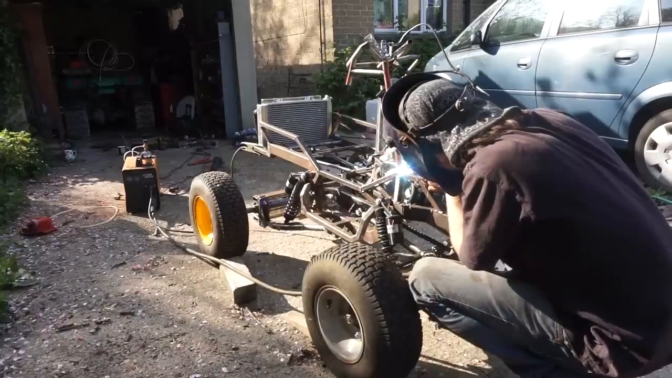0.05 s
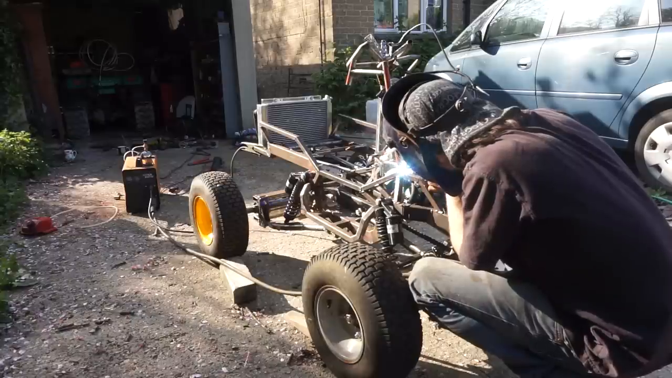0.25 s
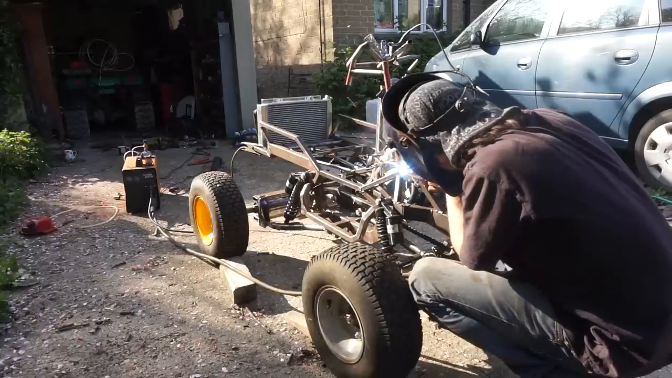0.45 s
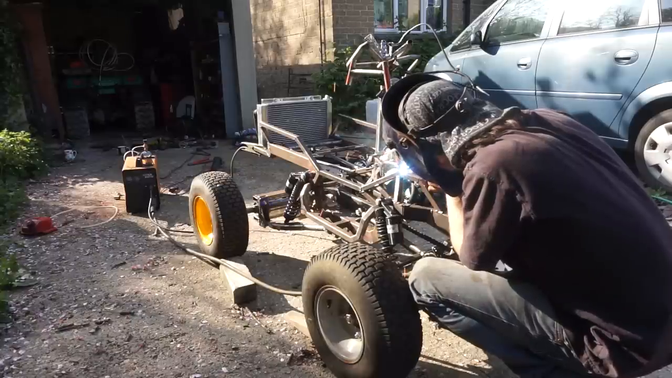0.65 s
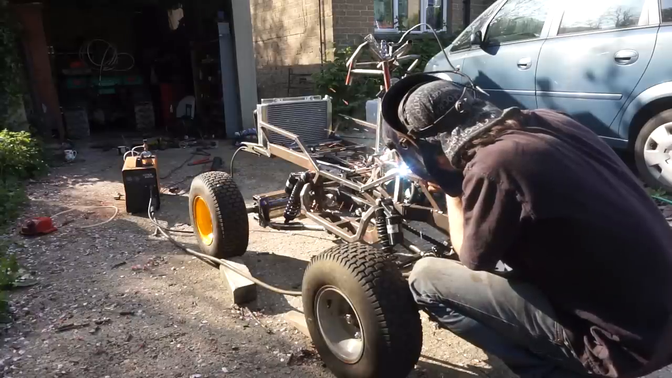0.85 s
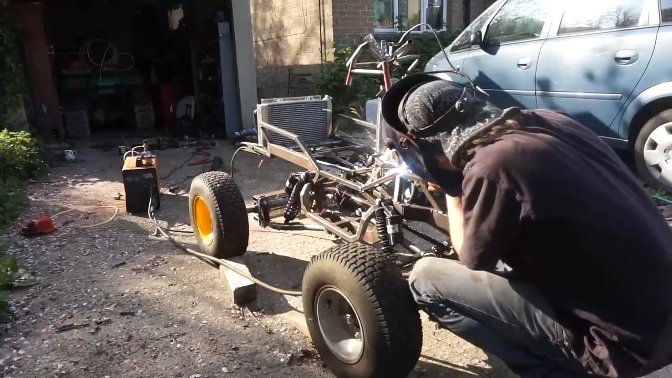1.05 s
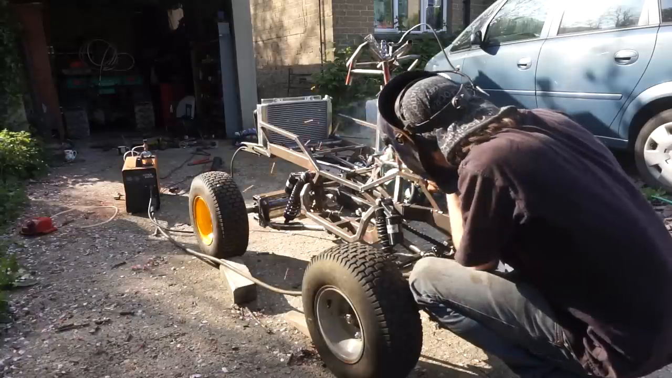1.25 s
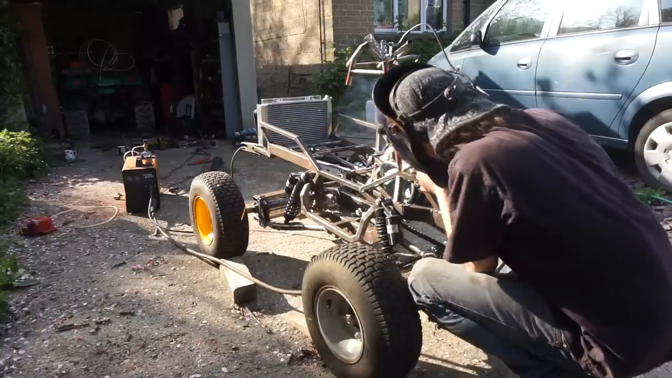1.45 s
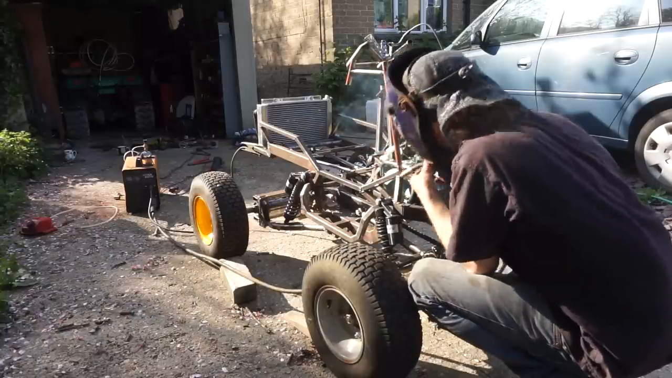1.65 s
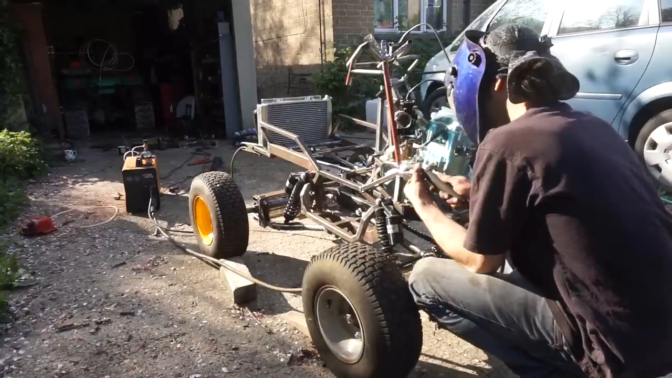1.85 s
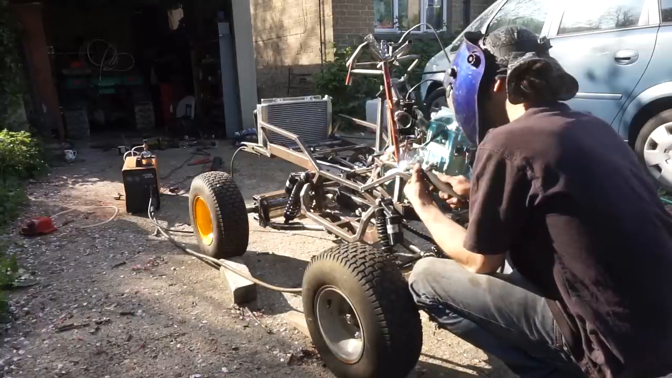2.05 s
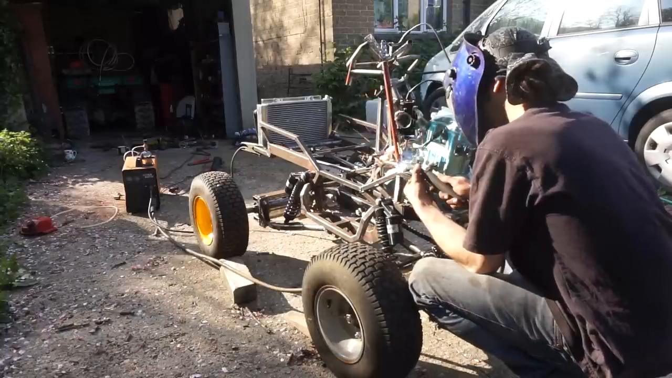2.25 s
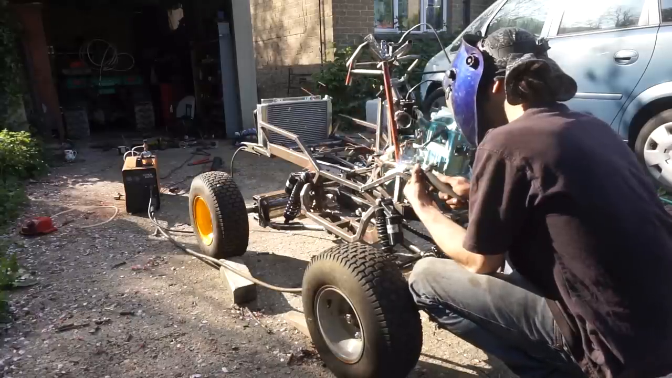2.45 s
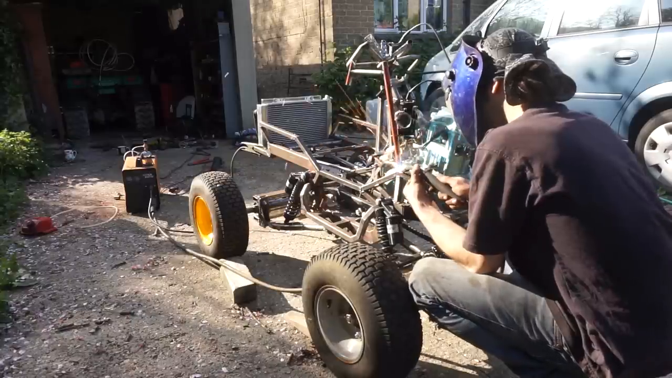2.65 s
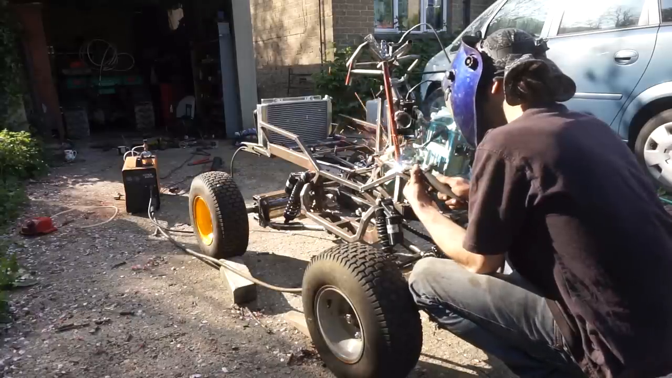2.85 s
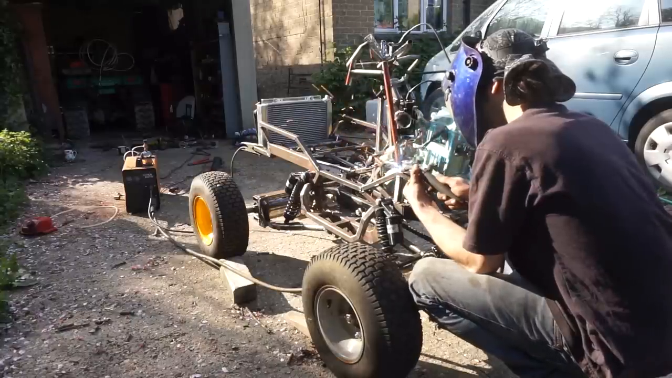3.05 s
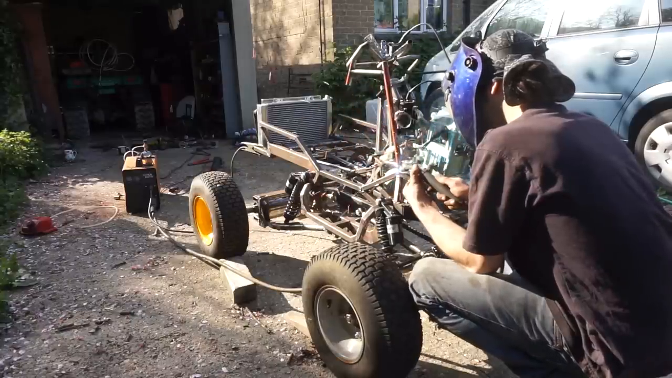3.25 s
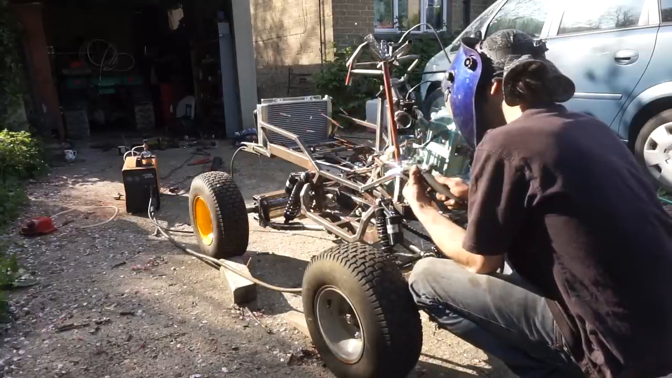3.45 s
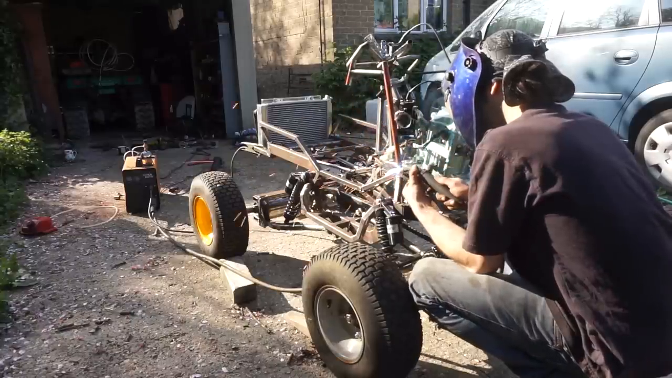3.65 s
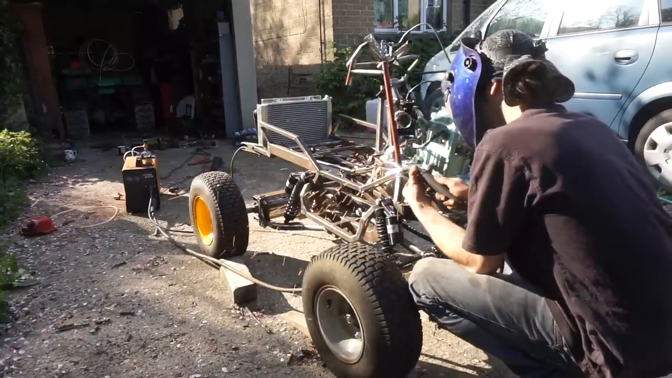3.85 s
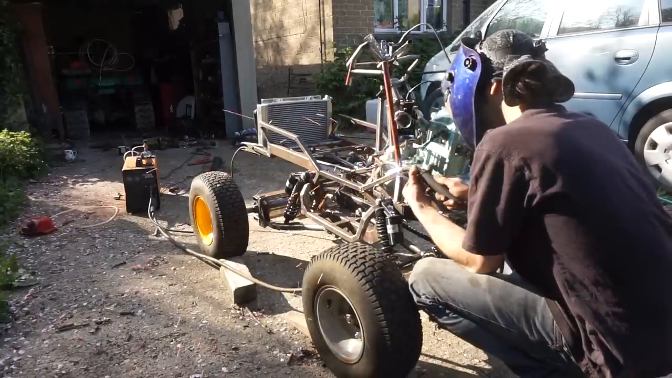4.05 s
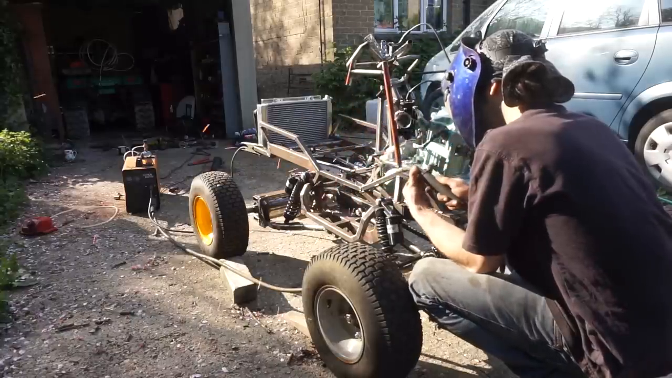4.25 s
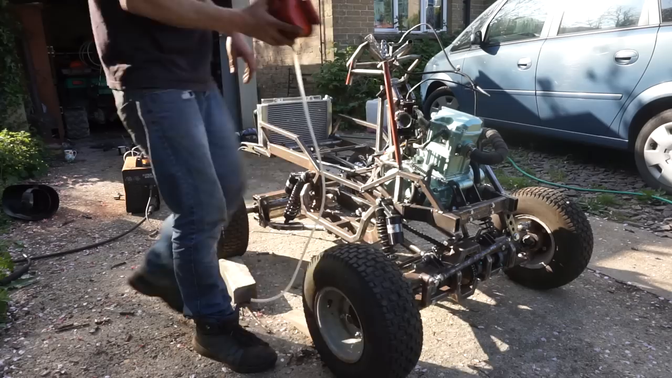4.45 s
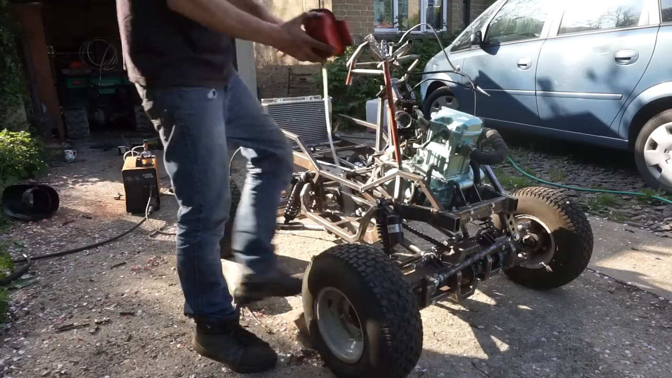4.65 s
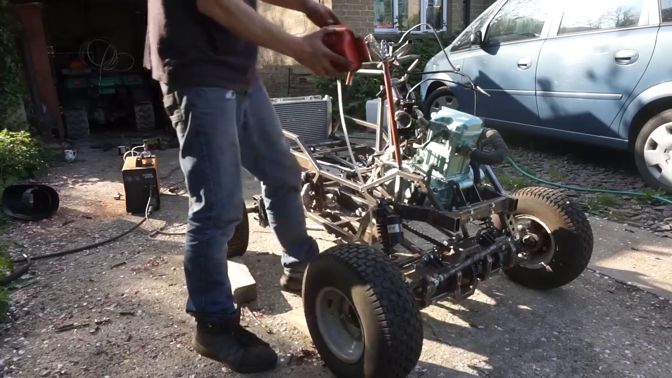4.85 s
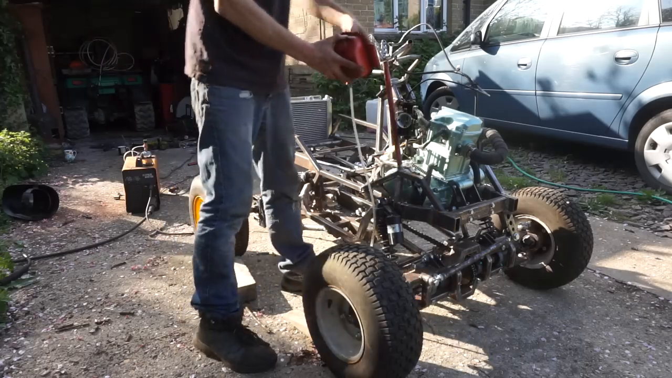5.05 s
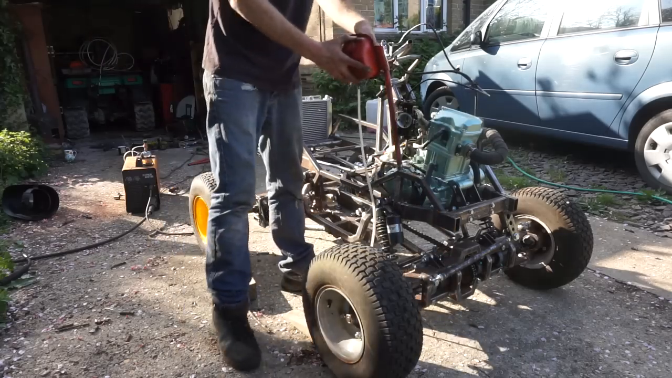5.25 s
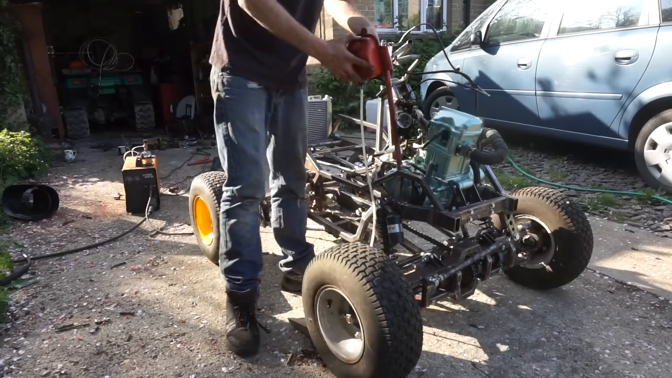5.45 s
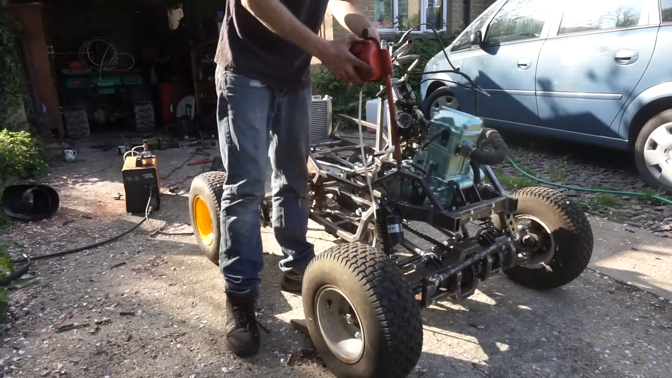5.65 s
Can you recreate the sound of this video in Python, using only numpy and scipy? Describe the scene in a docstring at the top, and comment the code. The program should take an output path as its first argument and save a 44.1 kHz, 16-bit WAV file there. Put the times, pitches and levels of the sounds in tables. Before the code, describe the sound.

A welder crackles loudly, stops, restarts and sputters, then cuts abruptly to quiet yard noise, gritty footsteps, hollow plastic knocks and bird chirps.

```python
"""Two bursts of short-circuit arc welding on a tube frame in a driveway, then a reel carried over gravel.
The first burst is under way at the start: each time the wire's molten bridge breaks, the arc relights with a pop.
In the pause birds call and shielding gas puffs; the second burst strikes, falters and relights until 4.2 s.
Tube frame, welder and yard throw every pop back: short paths, then a swaying reverberation.
At 4.487 s a cut: the background is heard louder, boots scuff gravel, a plastic cable reel knocks, birds call."""
import sys
import numpy as np
from scipy import signal
from scipy.fft import rfft, irfft, next_fast_len
from scipy.io import wavfile
from scipy.ndimage import uniform_filter1d

SR = 44100
rng = np.random.default_rng(int(sys.argv[2]) if len(sys.argv) > 2 else 0)


def pcm_store(signal):
    """Save signal as 16-bit PCM."""
    levels = np.round(np.clip(np.atleast_2d(signal), -1, 1) * 32767)
    wavfile.write(sys.argv[1], SR, levels.astype(np.int16).T)


N = 251370  # samples

# Yard wash during welding: time_s, level_db
WASH_WELDING_LEVEL = [(0, -66), (1.2, -64), (1.8, -60), (2.1, -65), (4.2, -70), (4.487, -69)]
# Its spectrum: freq_hz, density_db_per_hz
WASH_WELDING_COLOUR = [(20, -28.5), (40, -12), (130, -7.5), (215, -4.5), (370, -12), (560, -5.5),
                       (1500, -19), (2900, -24), (3600, -30), (8000, -37), (15600, -42)]
# Wash after the cut: freq_hz, density_db_per_hz
WASH_LATER_COLOUR = [(47, -31), (80, -0.5), (162, -8), (375, -7), (467, -3), (900, -1), (1250, -6),
                     (1540, -10.5), (2600, -19.5), (3970, -31.5), (7210, -32.5), (15600, -36)]
# Left-right likeness of background noise: freq_hz, likeness (0 to 1)
LIKENESS = [(60, 0.9), (180, 0.77), (550, 0.46), (1650, 0.25), (4970, 0.056), (15000, 0.52)]
# Shielding gas puffs as the trigger is pulled: time_s, level_db
GAS_LEVEL = [(1.725, -77), (1.757, -75), (1.762, -43.5), (1.845, -57)]
# Gas spectrum: freq_hz, density_db_per_hz
GAS_SPECTRUM = [(180, -32), (300, -0.5), (1440, -3), (2990, -12), (4900, -4.5), (10700, -12), (12400, -2),
                (15600, -13)]
# Power source fan and a thin whine: pitch_hz, welding_db, second_pause_db, after_cut_db
FAN_TONES = [(458, -68, -71, -62), (920, -88, -77, -72), (15402, -87, -91, -77)]
# Far bird notes: start_s, length_s, start_hz, end_hz, level_db
BIRD_NOTES = [(1.262, .045, 4600, 4450, -77), (1.495, .05, 4150, 4350, -75), (4.85, .075, 7150, 7000, -66),
              (4.965, .05, 7000, 6950, -66), (5.185, .062, 3650, 4380, -63), (5.325, .078, 3750, 4150, -57),
              (5.503, .09, 7100, 7200, -71)]
# Low throb: time_s, level_db
RUMBLE_LEVEL = [(0, -81.5), (3.3, -81), (3.7, -74), (4.486, -76), (4.49, -53), (5.7, -56)]
# Boot scuffs: peak_s, level_db, fall_by_20_db_s
BOOT_SCUFFS = [(4.49, -52, .04), (4.62, -51, .08), (4.728, -47, .07), (5.018, -51, .08), (5.245, -44, .05),
               (5.33, -43, .1), (5.375, -45, .08), (5.393, -42, .1), (5.466, -36, .04), (5.678, -40, .1)]
# Gravel spectrum: freq_hz, density_db_per_hz
GRAVEL_COLOUR = [(290, -32), (500, -2), (1310, -5), (1750, -3), (2770, -5), (3810, -11), (7000, -24),
                 (15600, -34)]
# Modes of the reel: pitch_hz, level_db, t60_s
REEL_MODES = [(400, -2, .035), (550, -2, .035), (700, 0, .045), (900, -4, .03), (1310, -3, .05),
              (1955, -9, .03), (2700, -8, .025), (3400, -5, .03), (4400, -1, .035)]
# Knocks on the reel: start_s, peak_db, struck_spot_hz, rattle_decay_ms, ring_length_factor, left_over_right_db
REEL_KNOCKS = [(4.618, -31, 720, 3, 1, .5), (5.1314, -25, 760, 1.5, 1.2, 1.5),
               (5.242, -33, 1900, 3, .6, 1.5), (5.318, -33, 600, 1, .5, 1), (5.327, -26, 560, 1, 1.1, 1.5),
               (5.3545, -24, 430, .6, 1.1, 1.5), (5.4463, -16, 1100, .3, .3, 1),
               (5.656, -28, 780, 6, 1.5, -1.5), (5.678, -24.5, 1250, 12, 1, -3)]
# Ticks of grit and cable: start_s, peak_db, pitch_hz, decay_ms
GRIT_TICKS = [(4.4881, -36, 3080, 2.1), (4.7254, -36, 3000, 2.7), (4.7556, -39, 5500, 2.6),
              (4.8165, -39, 3300, 1.2), (5.2914, -37, 3300, 2.6), (5.327, -31, 3000, 1.5),
              (5.338, -33, 2100, 4.0), (5.3946, -27, 2900, 2.1), (5.4628, -29, 3300, 1.9),
              (5.468, -28, 2650, 3.3)]
# Thumps of the striking arc, then of feet: start_s, level_db, pitch_hz
LOW_THUMPS = [(1.8615, -40, 190), (1.9055, -45, 170), (4.258, -51, 54), (4.647, -37, 98), (4.831, -40, 133),
              (4.929, -33, 242)]
# Yard reverberation: freq_hz, t60_s
YARD_DECAY = [(250, .35), (700, .3), (1700, .24), (4600, .21), (12000, .18)]
# Colour of one pop, a list per torch position: freq_hz, density_db_per_hz
POP_COLOURS = [
    [(60, -60), (110, -33), (250, -22), (380, -4), (560, -2), (795, -11.5), (1070, -5), (1640, -11),
     (2250, -7), (3200, -9.5), (4300, -7.5), (5230, -3.3), (7030, -.5), (13500, -.5), (15700, -4.5)],
    [(59, -44), (100, -24), (250, -25), (387, -7.5), (700, -12), (1070, -6), (1630, -5.5), (2290, -4),
     (3280, -11.5), (4250, -3.5), (5200, -4), (7180, 0), (13500, -1), (15700, -4.7)],
    [(59, -46), (100, -30), (240, -33), (420, -7), (700, -8), (1150, -1), (1630, -12), (2290, -9),
     (5120, -4.5), (6880, -2), (13500, -1.3), (15700, -3)],
]
# Paths by tubes, torch and hands, a list per torch position: delay_ms, left_gain, right_gain
POP_PATHS = [
    [(0.0, 0.7, 1.0), (0.152, 0.09, 0.04), (0.27, 0.1, 0.13), (0.352, -0.15, -0.17), (0.377, 0.15, 0.16),
     (0.483, -0.09, -0.15), (0.61, -0.15, -0.09), (0.87, 0.08, 0.14), (1.154, 0.06, 0.11), ],
    [(0.0, 0.65, 1.0), (0.212, 0.03, 0.1), (0.299, 0.15, 0.19), (0.488, -0.16, -0.29),
     (0.576, -0.21, -0.24), (0.622, -0.17, -0.16), (0.675, -0.11, -0.13), (0.786, -0.1, -0.17),],
    [(0.0, 0.72, 1.0), (0.16, 0.14, 0.05), (0.303, 0.15, 0.21), (0.375, 0.05, 0.18), (0.456, 0.17, 0.16),
     (0.675, -0.12, -0.09), (0.799, -0.08, -0.17), (0.87, 0.07, 0.11)],
]
# Weight of the yard's returns per torch position: weight_db
YARD_WEIGHTS = [-8.5, -9, -10.5]
# Weight of the blurred noise after each pop, per torch position: weight_db
SCATTER_WEIGHTS = [-28, -25.5, -28]
# Torch changes position: middle_of_crossfade_s
TORCH_MOVES = [1.5, 3.06]
# Welding bursts: time_s, pop_peak_db, wait_between_pops_ms
WELD_BURSTS = [
    [(-.13, -10.5, 5.3), (.2, -9.5, 5.3), (.4, -11.5, 5.5), (.7, -11.5, 6), (1.104, -11.5, 5.9)],
    [(1.844, -23, 4), (1.87, -10, 5.6), (2.3, -9, 5.6), (2.85, -9, 5.8), (3.1, -10, 6), (3.35, -10.5, 6),
     (3.57, -11, 4.8), (3.75, -9.7, 6), (3.95, -10, 6.8), (4.16, -10, 6.6)],
]
# Arc strikes, or falters and relights: time_s, peak_db, silence_before_ms, added_wait_after_ms
ARC_RELIGHTS = [(1.1011, -8, 6, 0), (1.8449, -18, 1, 0), (1.8629, -3.5, 6, 7), (1.907, -3.5, 6, 4.5),
                (1.9384, -8, 7, 4), (2.2962, -4, 8, 0), (2.629, -10, 12, 3), (2.7878, -5.5, 11, 1),
                (3.3002, -12, 14, 0), (3.4276, -7, 9, 1), (3.4424, -18, 8, 0), (3.4725, -14, 33, 9),
                (3.4885, -6.5, 18, 5), (3.6377, -6, 12.5, 1), (3.6626, -8.5, 11, 2.5),
                (3.6976, -5.5, 8.5, 0), (3.9261, -10.5, 16, 1), (4.1197, -4.5, 7, 0), (4.1575, -9.5, 8, 0)]
# Left over right for the arc: freq_hz, difference_db
ARC_BALANCE = [(400, 0), (1100, 1), (1600, -.3), (2300, -1.2), (3500, -1.7), (5000, -1.3), (8000, 1),
               (13000, 2.3)]
# Peaks and dips that ground and frame put on all the arc sends out: freq_hz, gain_db
GROUND_COLOUR = [(650, 0), (770, -3), (860, 2), (960, -3), (1085, 1), (1250, -2), (1380, -9), (1510, 2),
                 (1640, -2.5), (1800, 0)]
# Left-right difference of the capsules: freq_hz, gain_db
SIDE_GAIN = [(30, -20), (125, -12), (250, -16), (1000, -3.5), (2000, 2.5), (4000, -1.5), (8000, -4.5),
             (12000, -1.5)]

CUT_S, WASH_LATER_DB = 4.487, -43.5
BIRD_GLIDE_SHARE, BIRD_WARBLE_HZ, BIRD_HOARSE_DB = .18, 60, 5  # glide: time constant, share of the note
SCUFF_RISE_S, SHUFFLE_DB = .015, -59  # rise: 20 dB in this time
FOCUS_DB_PER_OCTAVE = 14  # modes weaken away from the struck spot's pitch
CLOSE_DB, CLOSE_T60_S, CLOSE_HZ = 6.5, .018, 2500  # close things: against the yard, weak below CLOSE_HZ
FAR_DB, FAR_T60_S = -33, .7  # faint far returns linger: against the yard
LEAD_RAD = .4  # phase lead of a pop
LEAD_SAMPLES = 256  # kept ahead of a pop's front
RUN_IN_SAMPLES = 6000  # welding before the start, its echoes still in the yard
SETTLE_S = .055  # added wait has shrunk to about a third
WAIT_SCATTER, PEAK_SCATTER_DB = .1, 1.7
HELD_FACTOR, EARLY_FACTOR, EARLY_DB = 1.45, .7, -6  # bridge holds on, or breaks early and small
MEMORY, PAUSE_PER_SIZE = .18, .04  # each wait and size leans on the last; a big pop, a longer wait
SCATTER_PEAK_MS = .3  # after the pop
SWAY_HZ = .45  # hands and body sway, so the returns keep changing


def amp(db):
    """Gain of a level in dB."""
    return 10 ** (np.asarray(db) / 20)


def evened(x):
    """Scaled to rms 1."""
    return x / np.sqrt(np.mean(x ** 2) + 1e-20)


def read(points, hz):
    """Spectrum table read on a log frequency axis."""
    freq_hz, value = np.transpose(points)
    return np.interp(np.log(hz + 1), np.log(freq_hz + 1), value)


def curve(rows):
    """Gain from a level curve, silent outside the table."""
    time_s, level_db = np.transpose(rows)
    return amp(np.interp(np.arange(N) / SR, time_s, level_db, -200, -200))


def add(mix, start_s, sound, pan_db=0):
    """Mixes a sound into both channels; positive pan_db leans left."""
    part = mix[:, round(start_s * SR):][:, :len(sound)]
    part += amp([[pan_db / 2], [-pan_db / 2]]) * sound[:part.shape[1]]


def coloured(x, colour):
    """Filtered by a spectrum table without delay."""
    size = next_fast_len(x.shape[-1] + 4096)
    gain = amp(read(colour, np.fft.rfftfreq(size, 1 / SR)))
    return irfft(rfft(x, size) * gain, size)[..., :x.shape[-1]]


def noise(colour, patchy_db):
    """Two-channel noise with drifting patches in time and frequency, alike as LIKENESS says."""
    frames, hz = N // 256 + 5, np.fft.rfftfreq(1024, 1 / SR)
    a, b, c, d, patches = rng.standard_normal((frames, 513, 5)).T
    patches = uniform_filter1d(patches, size=10, axis=0)
    patches = evened(uniform_filter1d(patches, size=10, axis=1))
    same = read(LIKENESS, hz)[:, None]
    left = a + 1j * b
    right = same * left + np.sqrt(1 - same ** 2) * (c + 1j * d)
    bins = np.array([left, right]) * amp(read(colour, hz)[:, None] + patchy_db * patches)
    return evened(signal.istft(bins, nperseg=1024, noverlap=768)[1][:, :N])


def tail(rise_ms, alike):
    """Reverberation of energy 1 (left): dense random returns, each band dying at its own speed."""
    shared, *own = rng.standard_normal((3, SR // 2))
    returns = alike * shared + np.sqrt(1 - alike ** 2) * np.array(own)
    hz, t, bins = signal.stft(returns, SR, nperseg=128)
    small = (hz ** 2 / (hz ** 2 + CLOSE_HZ ** 2))[:, None]  # small things return little bass
    dying = amp(-60 * t / read(YARD_DECAY, hz)[:, None])
    dying = dying + amp(CLOSE_DB - 60 * t / CLOSE_T60_S) * small
    dying = dying + amp(FAR_DB - 60 * t / FAR_T60_S)
    out = signal.istft(bins * dying, SR, nperseg=128)[1]
    out *= np.clip(np.arange(out.shape[1]) / SR * 1000 / rise_ms, 0, 1)
    return out / np.linalg.norm(out[0])


def yard_wash():
    """Patchy noise: a slowly moving level before the cut, a steady one after, each with its colour."""
    later = np.arange(N) / SR > CUT_S
    out = curve(WASH_WELDING_LEVEL) * noise(WASH_WELDING_COLOUR, patchy_db=1.2)
    return out + amp(WASH_LATER_DB) * later * noise(WASH_LATER_COLOUR, patchy_db=2)


def fan_tones():
    """Fan and whine: steady sines with slowly drifting level and phase."""
    t, out = np.arange(N) / SR, np.zeros((2, N))
    for hz, welding_db, pause_db, later_db in FAN_TONES:
        level_db = np.where(t < CUT_S, np.interp(t, [1.7, 4.2], [welding_db, pause_db]), later_db)
        drift = evened(uniform_filter1d(rng.standard_normal(N), size=1500))
        out += np.sqrt(2) * amp(level_db + 3.0 * drift) * np.sin(2 * np.pi * hz * t + 0.13 * drift)
    return out


def birds():
    """Far bird notes: sines gliding to their end pitch, pitch and level wobbling."""
    out = np.zeros((2, N))
    for start_s, length_s, start_hz, end_hz, level_db in BIRD_NOTES:
        u = np.linspace(0, 1, round(length_s * SR))
        pitch, level = evened(uniform_filter1d(rng.standard_normal((2, len(u))), size=200))
        hz = end_hz + (start_hz - end_hz) * np.exp(-u / BIRD_GLIDE_SHARE) + BIRD_WARBLE_HZ * pitch
        note = amp(level_db + BIRD_HOARSE_DB * level) * np.sin(2 * np.pi * np.cumsum(hz) / SR)
        add(out, start_s, note * np.sqrt(np.hanning(len(u))))
    return out


def rumble():
    """Low throb near 54 Hz: noise through two narrow resonances, swelling and fading."""
    throb = rng.standard_normal(N)
    for q in (2.5, 3.5):
        throb = signal.lfilter(*signal.iirpeak(54, q, SR), throb)
    return curve(RUMBLE_LEVEL) * evened(throb)


def gas_puff():
    """Shielding gas puffing out of the torch: shaped turbulent noise."""
    return curve(GAS_LEVEL) * noise(GAS_SPECTRUM, patchy_db=2)


def gravel():
    """Grit crunching under boots: noise broken into 2.5 ms grains, swelling at each scuff."""
    grains = amp(4.5 * np.minimum(rng.exponential(1, N), 2)) * (rng.random(N) < 500 / SR)  # 500 per s
    grains = signal.lfilter([1], [1, -np.exp(-1000 / (2.5 * SR))], grains)
    t = np.arange(N) / SR
    level = amp(SHUFFLE_DB)
    for peak_s, level_db, fall_s in BOOT_SCUFFS:
        away = np.maximum((peak_s - t) / SCUFF_RISE_S, (t - peak_s) / fall_s)
        level = level + amp(level_db - 20 * away)
    return (t > CUT_S) * level * evened((0.35 + evened(grains)) * noise(GRAVEL_COLOUR, patchy_db=0.5))


def add_knocks(mix, t):
    """Hollow reel struck: its modes and a contact crack, excited by a blow and chattering loose parts."""
    for start_s, peak_db, spot_hz, rattle_ms, length, pan_db in REEL_KNOCKS:
        hiss = rng.standard_normal(len(t))
        ring = .7 * (1 - t / .00012) * np.exp(-t / .00012)  # contact crack
        for (hz, mode_db, t60_s), detune in zip(REEL_MODES, rng.standard_normal(len(REEL_MODES))):
            focus_db = -FOCUS_DB_PER_OCTAVE * abs(np.log2(hz / spot_hz))
            decay = amp(mode_db + focus_db - 60 * t / (t60_s * length))
            ring += decay * np.sin(2 * np.pi * hz * (1 + .012 * detune) * t)
        blow = (t == 0) + 0.11 * hiss * np.exp(-1000 * t / rattle_ms)
        sound = signal.oaconvolve(blow, ring)[:len(t)]
        sound = signal.lfilter(*signal.butter(2, 250, "high", fs=SR), sound)  # small body, no bass
        add(mix, start_s, amp(peak_db) * sound / abs(sound).max(), pan_db)


def add_ticks(mix, t):
    """Grit and cable ticks: short decaying noise in a resonant band."""
    for start_s, peak_db, hz, decay_ms in GRIT_TICKS:
        peak = signal.iirpeak(hz, .9, SR)
        band = signal.lfilter(*peak, signal.lfilter(*peak, rng.standard_normal(len(t))))
        band *= np.exp(-1000 * t / decay_ms)
        add(mix, start_s, amp(peak_db) * band / abs(band).max())


def add_thumps(mix, t):
    """Low puffs: a sine under an envelope about one cycle long."""
    for start_s, level_db, hz in LOW_THUMPS:
        envelope = (t * hz / 0.78) * np.exp(1 - t * hz / 0.52)
        add(mix, start_s, amp(level_db) * np.sin(2 * np.pi * hz * t) * envelope)


def handling():
    """Knocks, ticks and thumps with the yard's returns."""
    out, t = np.zeros((2, N)), np.arange(4000) / SR
    add_knocks(out, t)
    add_ticks(out, t)
    add_thumps(out, t)
    returns = signal.fftconvolve(out.mean(0)[None], tail(3.2, alike=0.62), axes=1)[:, :N]
    return out + amp(-7) * returns


def pop_shape(paths, colour):
    """One pop: a minimum-phase pulse of the given colour, led in phase, summed over all paths."""
    hz = np.fft.rfftfreq(4096, 1 / SR)
    log_gain = np.log(amp(read(colour, hz)))
    causal = np.exp(np.conj(signal.hilbert(np.r_[log_gain, log_gain[-2:0:-1]])))[:len(hz)]
    ms, left, right = np.transpose(list(paths) + [(4.8, 0.046, .12)])  # last: the car's flank
    delay_s = (ms[:, None] + np.array([[[.008]], [[0]]])) / 1000  # right capsule slightly first
    both = (np.array([left, right])[:, :, None] * np.exp(-2j * np.pi * hz * delay_s)).sum(1)
    both *= amp(np.outer([.5, -.5], read(ARC_BALANCE, hz))) * np.exp(1j * LEAD_RAD)
    return -np.roll(irfft(causal * both), LEAD_SAMPLES, axis=1)[:, :2048 + LEAD_SAMPLES]


def pop_train(shape):
    """Pops at uneven waits; after a falter the arc relights and waits shrink to their usual length."""
    train = np.zeros(RUN_IN_SAMPLES + N)
    for rows in WELD_BURSTS:
        time_s, level_db, wait_ms = np.transpose(rows)
        t, lit_s, added_ms = time_s[0], time_s[0], 0
        ahead = [row for row in ARC_RELIGHTS if time_s[0] < row[0] < time_s[-1]]
        chance = rng.standard_normal((600, 3))
        leaning = [np.sqrt(1 - MEMORY ** 2)], [1, -MEMORY]
        chance[:, :2] = signal.lfilter(*leaning, chance[:, :2], axis=0)
        for (wait, size, kind), last_size in zip(chance, np.roll(chance[:, 1], 1)):
            held, early = kind > 1.8, kind < -2.0
            factor = np.exp(WAIT_SCATTER * wait + PAUSE_PER_SIZE * last_size)
            factor *= HELD_FACTOR if held else EARLY_FACTOR if early else 1
            extra_ms = added_ms * np.exp(-((t - lit_s) / SETTLE_S) ** 2)
            t += factor * (np.interp(t, time_s, wait_ms) + extra_ms) / 1000
            peak_db = np.interp(t, time_s, level_db) + PEAK_SCATTER_DB * size + EARLY_DB * early
            half_wait_ms = np.interp(t, time_s, wait_ms) / 2
            if ahead and t > ahead[0][0] - (ahead[0][2] - half_wait_ms) / 1000:  # falls in the silence
                t, peak_db, _, added_ms = ahead.pop(0)
                lit_s = t
            if t > time_s[-1]:
                break
            at = RUN_IN_SAMPLES + round(t * SR) + np.arange(-8, 9)  # a pop falls between samples
            train[at] += amp(peak_db) * np.sinc(at - RUN_IN_SAMPLES - t * SR) * np.hanning(len(at))
    return train / abs(shape.mean(0)).max()


def scatter_noise(train):
    """Scatter: each pop is followed by a short, blurred burst of noise, partly shared by the channels."""
    n = len(train)
    u = np.arange(200) / SR * 1000 / SCATTER_PEAK_MS
    burst = signal.oaconvolve(train, u * np.exp(1 - u))[:n]
    shared, *own = rng.standard_normal((3, n))
    return burst * (shared + 1.1 * np.array(own))


def arc():
    """Welding arc: pops and their scatter pass the paths of the torch position and fill the yard."""
    shapes = [pop_shape(paths, colour) for paths, colour in zip(POP_PATHS, POP_COLOURS)]
    train = pop_train(shapes[1])
    scatter = scatter_noise(train)
    n = len(train)
    t, out = (np.arange(n) - RUN_IN_SAMPLES) / SR, np.zeros((2, n))
    sways = np.cos(2 * np.pi * SWAY_HZ * t), np.sin(2 * np.pi * SWAY_HZ * t)
    edges = np.r_[-1, TORCH_MOVES, N / SR + 1]
    positions = zip(shapes, POP_COLOURS, YARD_WEIGHTS, SCATTER_WEIGHTS, edges, edges[1:])
    for shape, colour, yard_db, scatter_db, start_s, end_s in positions:
        share = np.clip((t - start_s) / .6 + .5, 0, 1) - np.clip((t - end_s) / .6 + .5, 0, 1)
        drive = (train + amp(scatter_db) * scatter) * share
        bare_shape = pop_shape([(0, 1, 1)], colour)  # leaves in other directions
        direct, bare = [signal.oaconvolve(drive, pulse, axes=1)[:, LEAD_SAMPLES:n + LEAD_SAMPLES]
                        for pulse in (shape, bare_shape)]
        out += direct
        for sway in sways:
            sent = (direct + 0.89 * bare) * sway
            out += amp(yard_db) * signal.fftconvolve(sent, tail(0.83, alike=0.4), axes=1)[:, :n]
    return coloured(out, GROUND_COLOUR)[:, RUN_IN_SAMPLES:]


def scene():
    """All sources summed."""
    return yard_wash() + fan_tones() + birds() + rumble() + gas_puff() + gravel() + handling() + arc()


def record(dry):
    """Close capsules hear the bass alike and add a faint hiss; a steep low-pass ends the band."""
    mid, side = dry.mean(0), (dry[0] - dry[1]) / 2
    side = coloured(side, SIDE_GAIN)
    hiss = amp(-81.5) * rng.standard_normal((2, N))
    low_pass = signal.firwin(1023, 15860, window=("kaiser", 9), fs=SR)  # edge in Hz
    return signal.oaconvolve(np.array([mid + side, mid - side]) + hiss, low_pass[None], "same")


dry = scene()
out = record(dry)
pcm_store(out)
```